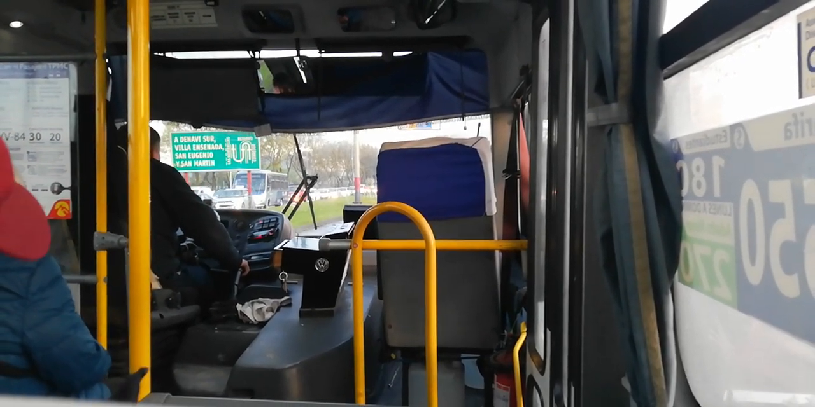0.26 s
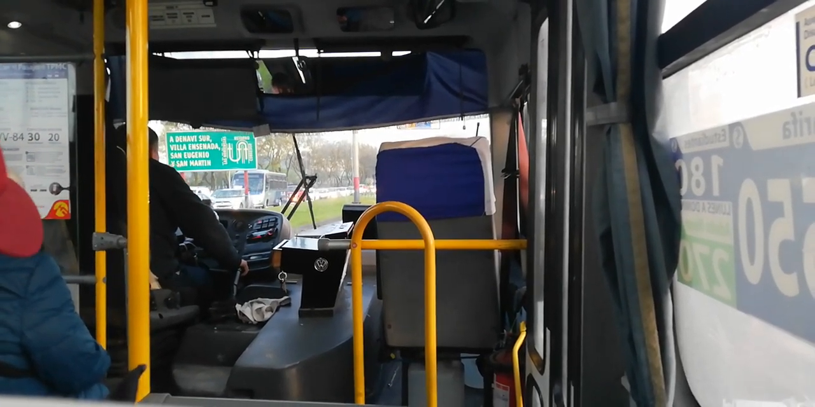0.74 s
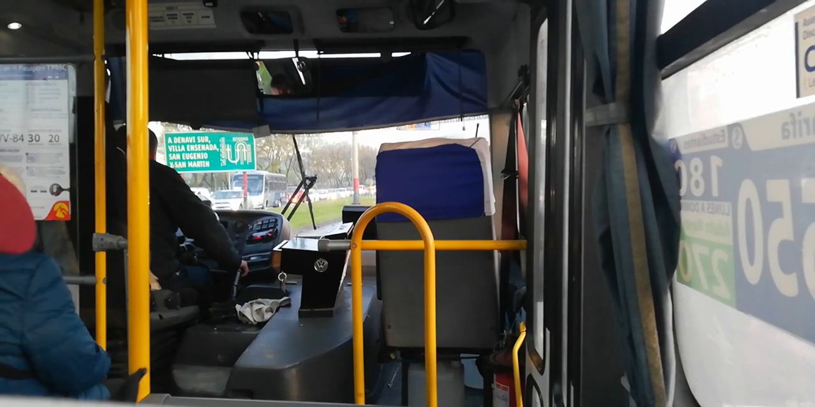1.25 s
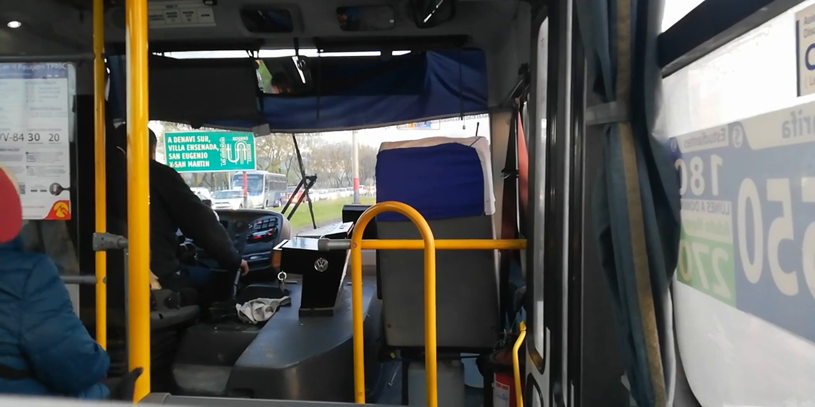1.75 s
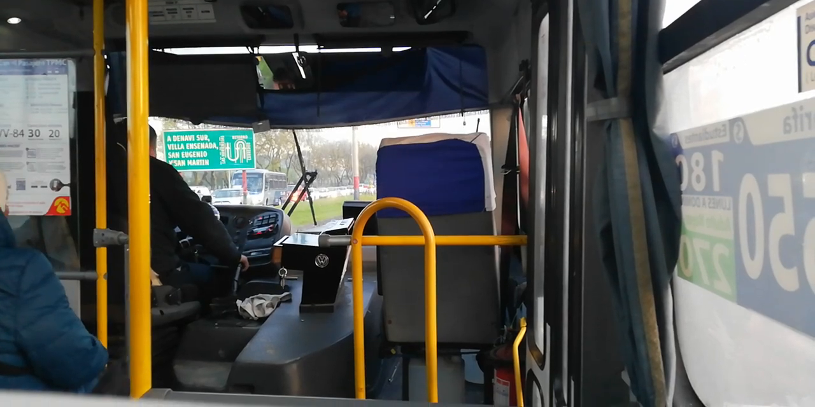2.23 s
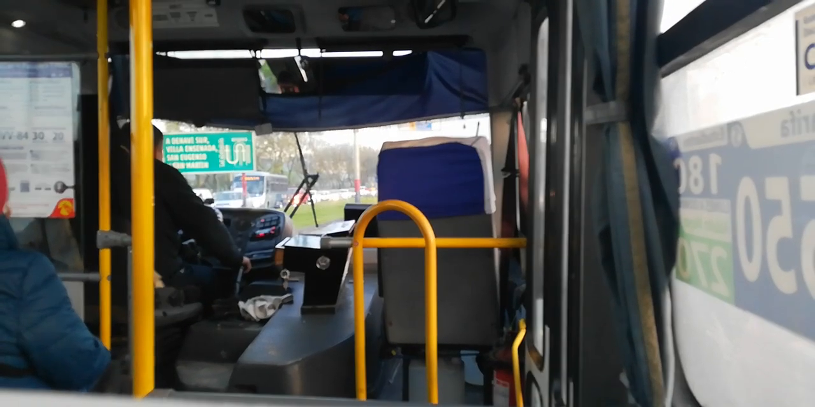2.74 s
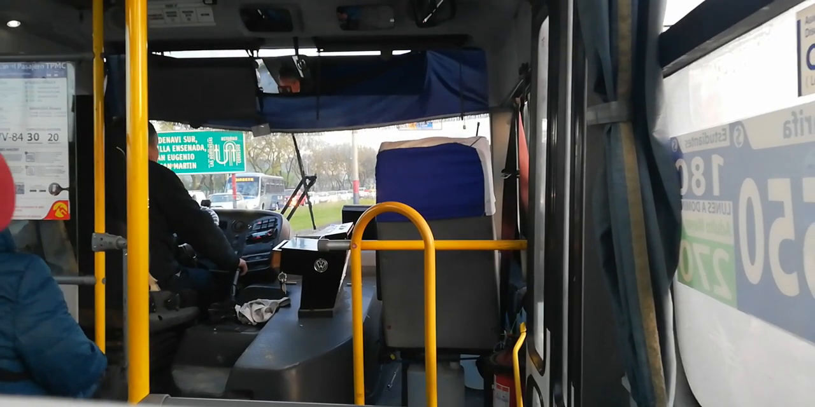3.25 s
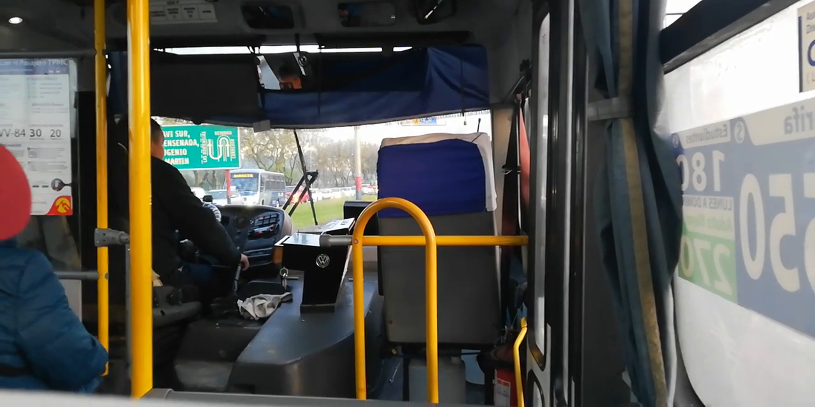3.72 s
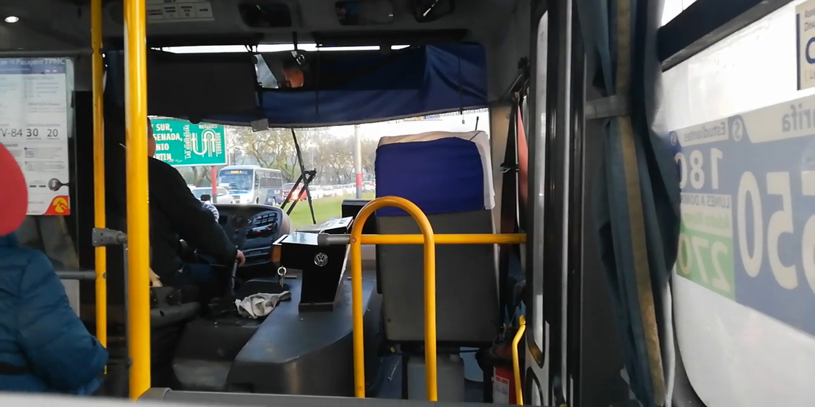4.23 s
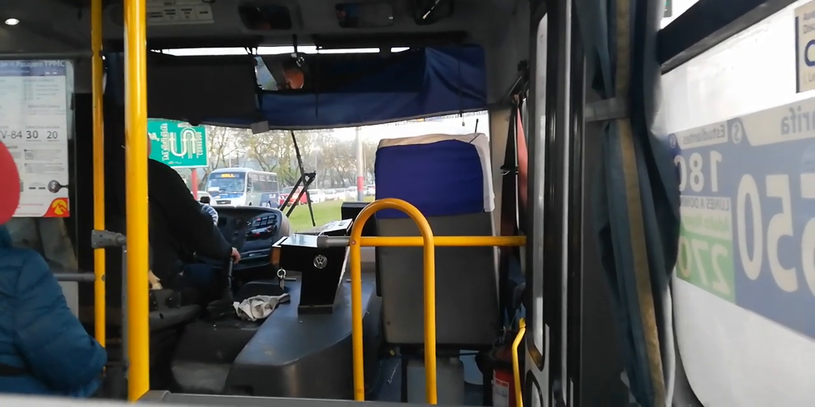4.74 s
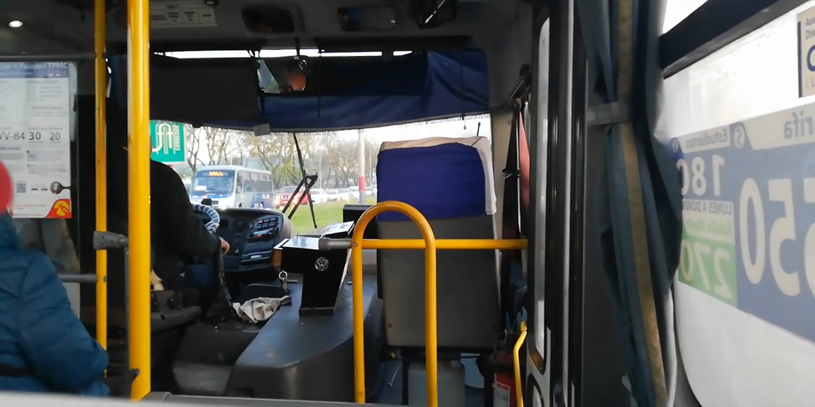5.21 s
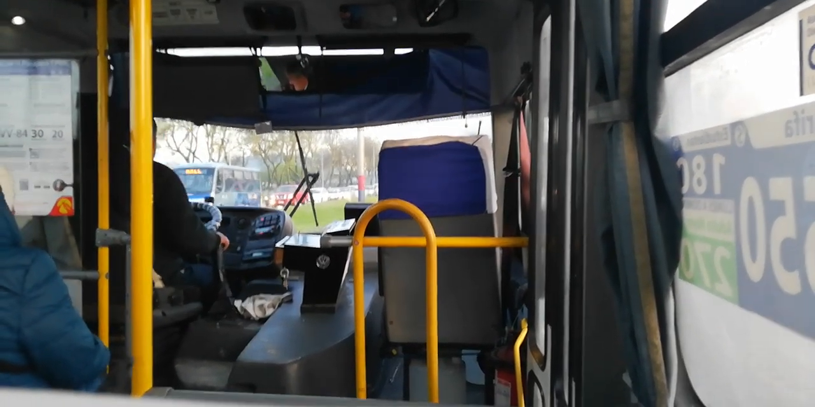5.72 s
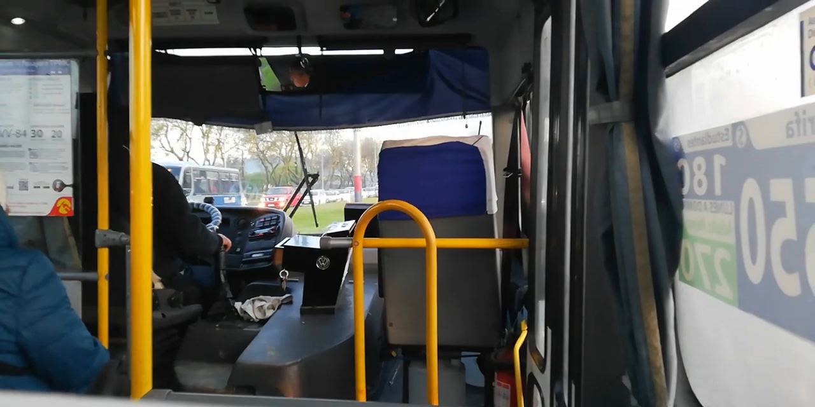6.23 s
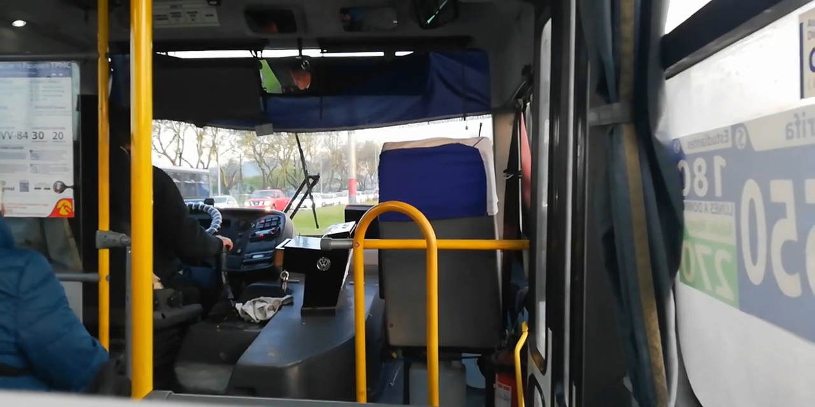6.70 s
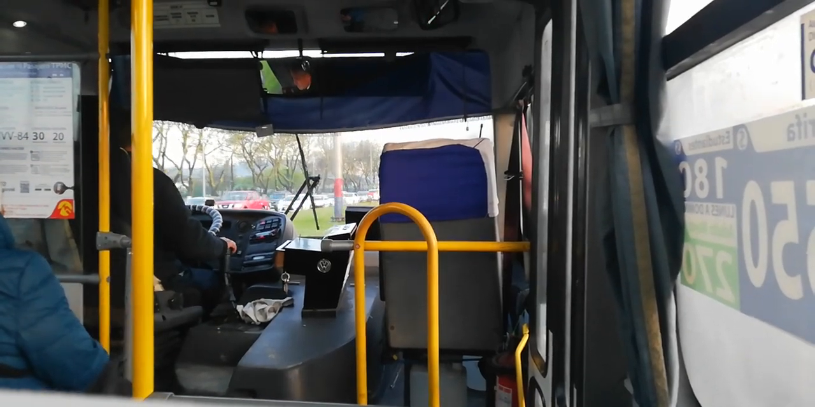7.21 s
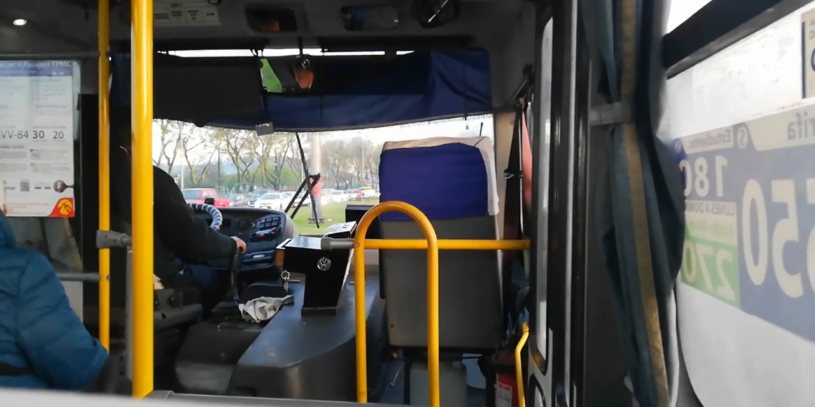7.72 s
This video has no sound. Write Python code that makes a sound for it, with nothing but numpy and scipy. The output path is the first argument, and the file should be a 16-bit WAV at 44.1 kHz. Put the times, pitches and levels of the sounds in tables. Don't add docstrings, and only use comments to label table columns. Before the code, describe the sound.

A four-cylinder diesel chugs quietly at idle, then its boom and clatter swell as the bus moves off. The pitch peaks midway, sinks during the gear change, and rises steadily again. Body thumps, dull panel knocks and a sharp tick cluster near six seconds, over air hiss and a very faint turbo whistle. Recorded in stereo from a seat in the cabin.

```python
import sys
import numpy as np
from scipy import signal
from scipy.fft import rfft, irfft, next_fast_len
from scipy.io import wavfile
from scipy.ndimage import uniform_filter1d, map_coordinates

SR = 44100
rng = np.random.default_rng(int(sys.argv[2]) if len(sys.argv) > 2 else 0)


def dump(signal):
    limited = np.clip(np.atleast_2d(signal).T, -1, 1)
    pcm = np.round(limited * 32767).astype(np.int16)
    wavfile.write(sys.argv[1], SR, pcm)


def gain_from_decibels(decibels):
    exponent = np.asarray(decibels, float) / 20
    return 10 ** exponent


N = 351014
TIME = np.arange(N) / SR


def unit(x):
    return x / np.sqrt(np.mean(x ** 2) + 1e-20)


def along(points, hz):
    f, v = np.transpose(points)
    return np.interp(np.log(hz + 1), np.log(f + 1), v)


def curves(rows):
    s, *columns = np.transpose(rows)
    return [np.interp(TIME, s, column) for column in columns]


def wobble(rate):
    knots = rng.standard_normal(int(N * rate / SR) + 4)
    return map_coordinates(knots, [TIME * rate])


def filtered(x, response):
    m = next_fast_len(N + SR // 2)
    spectrum = rfft(x, m) * response(np.fft.rfftfreq(m, 1 / SR))
    return irfft(spectrum, m)[..., :N]


def shade(points):
    return lambda hz: gain_from_decibels(along(points, hz))


def resonances(modes):
    def response(hz):
        total = 0
        for k, (centre, width, db) in enumerate(modes):
            damping = 1j * hz * width
            total = total + (-1) ** k * gain_from_decibels(db) * damping / (centre ** 2 - hz ** 2 + damping)
        return total
    return response


def rush(response, gate=1):
    # f/Hz, left-right likeness (-1 to 1)
    likeness = [(60, 1.0), (92, 0.99), (140, 0.97), (210, 0.95), (330, 0.45), (500, -0.49), (770, -0.21),
                (1170, 0.42), (1790, 0.06), (2740, 0.2), (4190, -0.04), (6410, -0.069), (9810, -0.05),
                (15000, -0.02)]

    def spread(hz):
        angle = np.arccos(np.clip(along(likeness, hz), -1, 1)) / 2
        return response(hz) * np.array([np.cos(angle), np.sin(angle)])

    mid, side = filtered(gate * rng.standard_normal((2, N)), spread)
    return unit(np.array([mid + side, mid - side]))


def cabin(x):
    # f/Hz, t60/s
    decay = [(200, .25), (2000, 0.23), (10000, .1)]
    hz, t, z = signal.stft(rng.standard_normal((2, SR // 3)), SR, nperseg=256)
    fading = z * gain_from_decibels(-60 * t / along(decay, hz)[:, None])
    tail = signal.istft(fading, SR, nperseg=256)[1]
    return signal.fftconvolve(x[None], tail / np.linalg.norm(tail[0]), axes=1)[:, :N]


def heave():
    # t/s, level/dB
    sway = [(0.0, -42), (0.62, -38.5), (0.84, -41), (1.64, -44), (1.84, -51), (1.97, -39), (2.44, -32),
            (2.52, -50), (2.95, -28), (3.21, -42), (3.5, -33), (3.68, -40), (4.06, -38), (4.41, -41),
            (4.79, -55), (4.92, -26), (5.05, -38), (5.14, -39), (5.41, -31), (5.5, -32), (5.7, -42),
            (5.81, -24.5), (5.87, -23.5), (5.96, -33), (6.18, -34), (6.25, -35), (6.41, -33), (6.85, -35),
            (6.94, -35), (7.07, -31), (7.18, -29), (7.4, -44), (7.51, -39), (7.8, -32), (7.87, -32),
            (7.96, -38)]
    rocking = filtered(rng.standard_normal(N), resonances([(18, 7.6, 0)]))
    return gain_from_decibels(curves(sway)[0]) * unit(rocking)


def rustles():
    # t/s, length/s, level/dB, centre f/Hz
    rubs = [(1.25, .12, -56.5, 6000), (1.74, .03, -55, 11000), (2.3, .05, -50.5, 9900),
            (2.7, .035, -53, 10000), (2.87, 0.028, -49, 9000), (2.94, 0.024, -50, 11000),
            (3.84, .04, -56, 9000), (5.0, .04, -48.5, 8000), (5.5, .025, -52, 10000),
            (5.889, .05, -46, 8500), (6.05, .015, -50, 8700), (6.1, .02, -44.5, 6000),
            (6.16, .02, -54, 8700), (6.26, .02, -48, 8000), (6.33, 0.029, -48, 7000),
            (6.611, .02, -54, 11000), (7.95, .02, -54, 9698)]
    out, hz = np.zeros((2, N + SR)), np.fft.rfftfreq(SR // 2, 1 / SR)
    t = TIME[:SR // 2] - .25
    for s, length, db, centre_hz in rubs:
        grain_db = 32 * uniform_filter1d(rng.standard_normal(len(t)), size=64)
        grains = rng.standard_normal((2, len(t))) * gain_from_decibels(grain_db)
        passband = np.exp(-(np.log((hz + 1) / centre_hz) / 0.37) ** 2)
        band = irfft(rfft(grains) * passband)
        swell = np.exp(-(t / length) ** 2)
        out[:, round((s - .25) * SR):][:, :len(t)] += gain_from_decibels(db) * unit(band) * swell
    return out[:, :N]


def ticks():
    # t/s, peak level/dB, f/Hz, low part level/dB, left minus right/dB
    touches = [(2.6366, -47, 9200, -2, 3), (2.67, -38.5, 6650, -20, -3.5), (2.8532, -40.5, 6160, -11, 0),
               (2.9345, -42, 5070, -11, -8), (3.1953, -51, 5150, -3, 0), (3.4253, -41, 5645, 3, 1),
               (4.9857, -40, 5230, 1, -1), (5.0261, -34.5, 7750, -4, -2), (5.8394, -34, 9010, -16, -1),
               (5.8877, -37, 9140, -6, 0), (5.9401, -22, 7800, -11, 6), (5.9715, -38, 7690, -16, -5.0),
               (6.0438, -38, 8750, -11, 1), (6.1501, -41, 8740, -5, 2), (6.2517, -39, 8770, -6, 4),
               (6.3216, -42, 5050, 1, 1)]
    out, t = np.zeros((2, N + SR)), TIME[:SR // 20]
    for s, db, hz, low_db, pan_db in touches:
        crack = np.diff(rng.standard_normal((2, len(t) + 1))) * gain_from_decibels(-2.5 - 60 * t / 0.017)
        ring = np.sin(2 * np.pi * hz * t) * gain_from_decibels(-60 * t / 0.023)
        low = np.sin(2 * np.pi * 2800 * t) * gain_from_decibels(low_db - 60 * t / 0.022)
        port_db = db + np.array([[pan_db], [-pan_db]]) / 2
        out[:, round(s * SR):][:, :len(t)] += gain_from_decibels(port_db) * (crack + ring + low)
    return out[:, :N] + gain_from_decibels(-5) * cabin(out[1, :N])


def panel():
    # t/s, peak level/dB, upper mode level/dB
    blows = [(3.615, -37, -8), (3.975, -49, 0), (4.012, -44, -4), (4.106, -44, 0), (4.196, -42, -1),
             (4.245, -35, -14), (4.529, -40, -9), (4.596, -34, -5), (4.845, -50, -6), (4.947, -34, -8),
             (5.007, -33, -4), (5.099, -53, -2), (5.175, -35, -15), (5.215, -42, -3), (5.315, -46, -2),
             (5.452, -44, -3), (5.639, -40, -2), (5.706, -36, -6), (5.75, -33, -12), (5.892, -21.5, -10.5),
             (5.959, -27, -7), (6.322, -35, -11), (6.504, -35, -9), (6.573, -40, -6), (6.614, -38, -9),
             (6.788, -34, -12), (6.924, -35, -11), (7.149, -41, -8), (7.225, -30.5, -8), (7.285, -41, -11),
             (7.315, -43, 0), (7.442, -43, -7), (7.566, -35, -8), (7.618, -38, -4)]
    # f/Hz, t60/s
    modes = [(572, 0.071), (1050, 0.047)]
    out, t = np.zeros(N + SR), TIME[:SR // 4]
    onset = 1 - np.exp(-t / .003)
    for s, db, upper_db in blows:
        ring = 0
        for (hz, t60), level_db in zip(modes, (0, upper_db)):
            ring = ring + gain_from_decibels(level_db - 60 * t / t60) * np.sin(2 * np.pi * hz * t)
        out[round(s * SR):][:len(t)] += gain_from_decibels(db + 3) * ring * onset
    near = out[:N]
    far = np.pad(near, (34, 0))[:N]
    return np.array([gain_from_decibels(-1) * far, gain_from_decibels(5.5) * near]) + gain_from_decibels(-9.5) * cabin(near)


def turbo():
    # t/s, f/Hz, level/dB
    whistle = [
        (4.2, 8300, -80),
        (4.4, 8700, -66),
        (4.62, 9500, -52),
        (4.75, 8800, -80),
        (6.7, 8402, -78),
        (6.9, 9000, -52),
        (7.2, 9720, -51.5),
        (7.5, 10400, -58),
        (7.9, 11290, -64),
    ]
    hz, db = curves(whistle)
    blur_hz = 90 * np.array([wobble(300), wobble(300)])
    turns = np.cumsum(hz + blur_hz, 1) / SR
    return np.sqrt(2) * gain_from_decibels(db) * np.sin(2 * np.pi * turns)


def puffs(firings, sizes_db, fall, scatter_db):
    index = firings.astype(int)
    chance_db = scatter_db * rng.standard_normal(index.max() + 1)
    size_db = np.take(sizes_db, index % 4) + chance_db[index]
    return gain_from_decibels(size_db) * np.exp(-fall * (firings % 1))


def firing_orders(firings, levels_db):
    tones = 0
    for multiple, db in zip((1, 2, 2.5, 3), levels_db):
        level = np.sqrt(2) * gain_from_decibels(db + .8 * wobble(8))
        turns = multiple * firings + 0.032 * wobble(6)
        tones = tones + level * np.sin(2 * np.pi * turns)
    return tones


def body_rumble(firings, db):
    # f/Hz, level/dB per Hz
    colour = [(15, -37), (25, -5), (54, -7.5), (70, -7), (92, -2), (156, -0.5), (168, -3), (195, -11.5),
              (227, -16), (252, -15.5), (419, -35), (509, -35), (565, -33), (657, -36.5), (900, -34),
              (1170, -75), (1980, -120)]
    gate = .8 + puffs(firings, np.zeros(4), fall=1.5, scatter_db=0.5)
    return gain_from_decibels(db + 1 + 1.2 * wobble(7)) * rush(shade(colour), gate)


def knock_clatter(firings, db):
    # f/Hz, level/dB per Hz
    colour = [(180, -27), (300, -3), (505, -6.5), (579, -11.5), (671, -13), (1380, -8), (1840, -11),
              (2060, -11), (2550, -14.5), (3130, -20), (4500, -23.5), (5850, -54), (9900, -120)]
    gate = 1.08 + puffs(firings, np.zeros(4), fall=2.4, scatter_db=3)
    return gain_from_decibels(db + 1.5 + .6 * wobble(6)) * rush(shade(colour), gate)


def block_ring(firings, db):
    # f/Hz, width/Hz, level/dB
    modes = [(935, 78, -6.5), (1332, 60, -2.5), (1424, 60, -1), (2054, 42, 5.5), (2242, 19.5, 3),
             (3170, 61, -3.5)]
    cylinders_db = [-13, -22.5, -20.5, -25.5]
    gate = .12 + puffs(firings, cylinders_db, fall=4, scatter_db=4.5)
    return gain_from_decibels(db - 4 + 1.6 * wobble(4)) * rush(resonances(modes), gate)


def air_rush(firings, db):
    # f/Hz, level/dB per Hz
    colour = [(1760, -30), (3000, -4), (3240, -4.5), (3370, -3), (4010, -13), (4890, -2), (6020, -6),
              (6680, -6.5), (7250, -8.5), (9040, -5), (13300, -22.5), (14500, -28), (15600, -31)]
    gate = 2.5 + puffs(firings, np.zeros(4), fall=3.1, scatter_db=6.5)
    return gain_from_decibels(db + 3.14 + .7 * wobble(9)) * rush(shade(colour), gate)


def engine():
    # t/s, firing rate f/Hz, then level/dB of the firing tone and its 2nd, 2.5th and 3rd multiples
    running = [(0.0, 24.6, -29, -36, -37, -38), (0.09, 24.7, -43, -53, -47, -33.5),
               (0.62, 24.6, -30.5, -43, -47, -32), (0.8, 24.6, -37, -45, -55, -35.5),
               (1.82, 24.6, -40, -47, -55, -35), (1.88, 24.4, -39, -46, -48, -32),
               (1.97, 25.9, -24, -44, -50, -27), (2.06, 27.3, -50, -41, -46, -32),
               (2.24, 30.5, -26, -26, -41, -24), (2.33, 32.49, -24, -40, -40, -34),
               (2.37, 32.67, -22, -33, -31, -21), (2.55, 33.78, -18, -37, -30.5, -41),
               (2.57, 34.16, -24, -32, -50, -44), (2.68, 33.73, -20.5, -29, -32, -30),
               (2.84, 32.6, -24.5, -46, -39, -38), (2.88, 32.3, -22.5, -28, -41, -38.5),
               (3.08, 31.13, -31, -41, -44, -24.5), (3.19, 30.3, -36, -25, -34, -29),
               (3.35, 35.44, -21.5, -39, -33, -30.5), (3.44, 38.48, -17.5, -33, -37, -30),
               (3.59, 44.75, -30, -31, -28, -29.5), (3.74, 47.58, -35, -48, -36, -22),
               (3.92, 50.52, -36, -44, -30, -20.5), (4.15, 55.7, -20, -22.5, -39, -35),
               (4.19, 57.1, -22, -48, -30, -34), (4.23, 58.3, -25, -29, -32, -38),
               (4.3, 60.08, -15, -32, -19.5, -52), (4.32, 60.75, -15, -37, -22.5, -42),
               (4.48, 64.9, -15, -27, -26, -50), (4.52, 65.8, -18, -45, -36, -34.5),
               (4.59, 68.0, -14.5, -25, -38, -37), (4.7, 65.6, -15, -23, -24, -42),
               (4.81, 62.07, -17.5, -23, -26.5, -48), (4.92, 59.94, -18, -40, -44, -35),
               (4.94, 59.15, -23.5, -30, -46, -46), (5.03, 57.3, -27, -48, -52, -28.5),
               (5.45, 49.1, -34.5, -40, -23.5, -34), (5.58, 46.4, -42, -31, -56, -57),
               (5.7, 44.9, -21, -32, -23.5, -22), (5.87, 41.6, -28, -33, -44, -32),
               (5.96, 39.8, -18.5, -26.5, -38, -26), (6.03, 38.7, -20, -35, -51, -42),
               (6.07, 38.08, -22, -20, -29, -50), (6.1, 37.7, -21, -18.5, -31, -35),
               (6.23, 39.3, -16, -24.5, -32, -42), (6.32, 41.3, -27, -40, -40, -20),
               (6.41, 42.68, -26, -19.5, -41, -28), (6.47, 43.46, -26, -52, -37, -44),
               (6.49, 43.8, -21.5, -33, -36, -43), (6.83, 47.9, -28.5, -33, -25, -23.5),
               (7.18, 52.6, -27, -34, -44, -25.5), (7.27, 53.6, -28, -18, -26, -26.5),
               (7.42, 55.64, -34, -45, -24, -33), (7.69, 58.97, -17.5, -29, -21.5, -48),
               (7.85, 60.57, -19, -23, -16.5, -41), (7.96, 61.2, -32, -36, -27.5, -39)]
    # t/s, body rumble level/dB, knock level/dB, air rush level/dB
    load = [(0.0, -37, -48, -58), (0.18, -37.5, -49, -59.5), (0.6, -37.5, -48.5, -60.5),
            (1.15, -36, -48.5, -58.5), (1.33, -36.5, -45.5, -57.5), (1.62, -37, -48.5, -57.5),
            (1.99, -30, -48, -57.5), (2.17, -24, -46, -53), (2.33, -24.5, -44.5, -54),
            (2.5, -23, -48, -55.5), (2.7, -28, -44, -54.5), (2.86, -27, -46, -51), (3.12, -27, -45.5, -56),
            (3.35, -26, -45, -52), (3.57, -26.5, -41.5, -51), (3.83, -22.5, -42, -47.5),
            (4.1, -25, -41, -48.5), (4.34, -21, -43, -49), (4.52, -24.5, -40, -50),
            (4.7, -23.5, -43.5, -51.5), (4.92, -29.5, -44.5, -53.5), (5.1, -25.5, -40, -49.5),
            (5.25, -23, -43, -51.5), (5.48, -30.5, -43, -52.5), (5.67, -24, -44, -52),
            (5.85, -26.5, -44, -51), (6.01, -23.5, -42.5, -49), (6.16, -26.5, -43.5, -50.5),
            (6.29, -24, -43.5, -50.5), (6.61, -26, -43, -49.5), (6.89, -23.5, -42, -48.5),
            (7.14, -26, -41, -50), (7.54, -22, -41, -47), (7.71, -22.5, -43, -48.5),
            (7.83, -24.5, -43.5, -50), (7.96, -25.5, -45, -53)]
    rate_hz, *levels_db = curves(running)
    rumble_db, knock_db, air_db = curves(load)
    firings = np.cumsum(rate_hz) / SR + 3.95
    tones = firing_orders(firings, levels_db)
    rumble = body_rumble(firings, rumble_db)
    knock = knock_clatter(firings, knock_db) + block_ring(firings, knock_db)
    return tones + rumble + knock + air_rush(firings, air_db)


def scene():
    return heave() + rustles() + ticks() + panel() + turbo() + engine()


def low_pass(x):
    return signal.sosfilt(signal.butter(12, 15740, fs=SR, output="sos"), x)


def record(dry):
    # f/Hz, left minus right/dB
    lean = [(60, 0.5), (110, 0.0), (200, -1.5), (380, -3.0), (700, -3), (1290, -2), (2380, -5), (4400, -1),
            (8120, -1.5), (15000, -10.5)]
    ports = filtered(dry, lambda hz: gain_from_decibels(along(lean, hz) * np.array([[.5], [-.5]])))
    return low_pass(ports)


dry = scene()
out = record(dry)
dump(out)
```